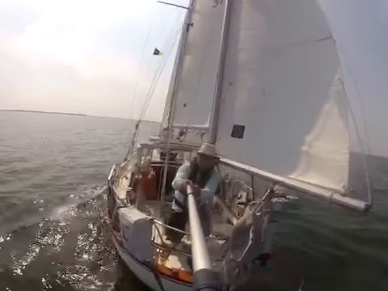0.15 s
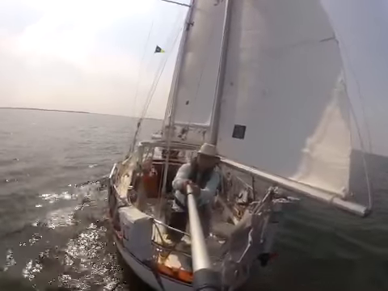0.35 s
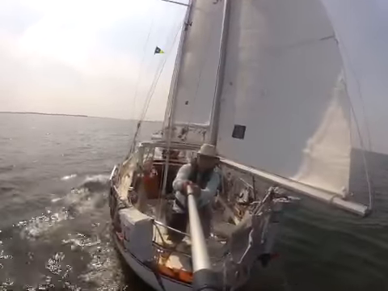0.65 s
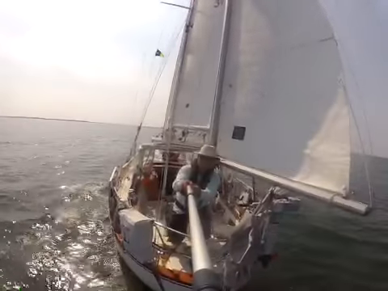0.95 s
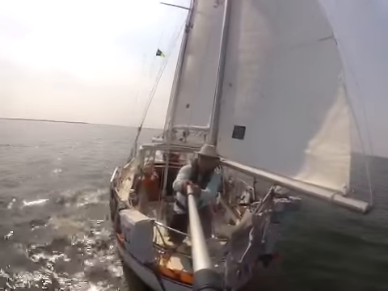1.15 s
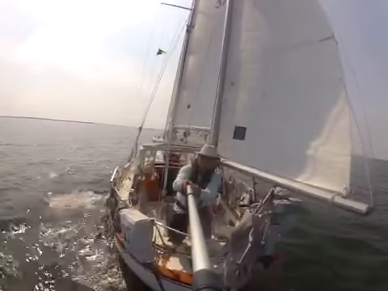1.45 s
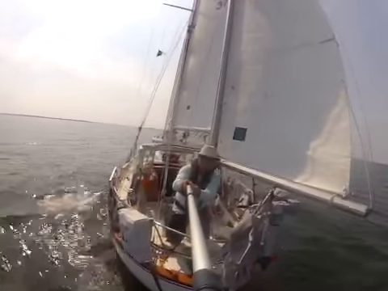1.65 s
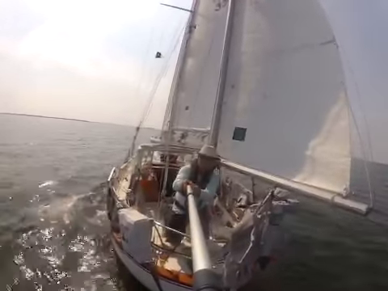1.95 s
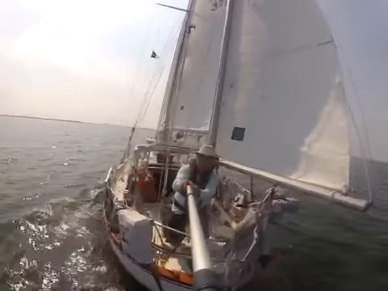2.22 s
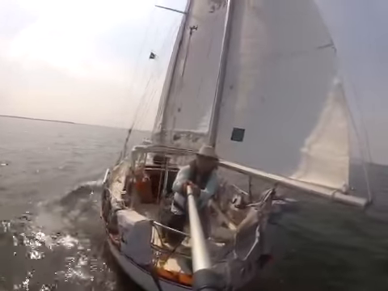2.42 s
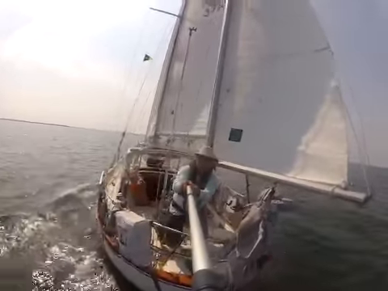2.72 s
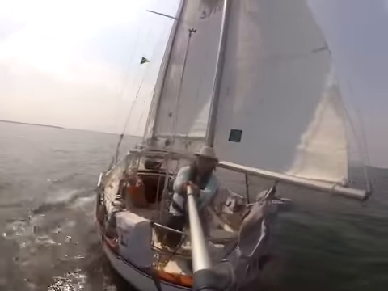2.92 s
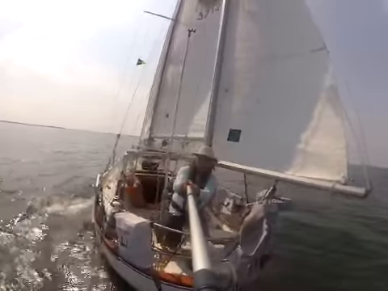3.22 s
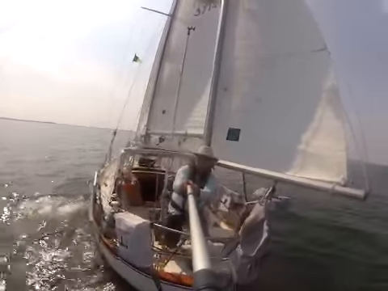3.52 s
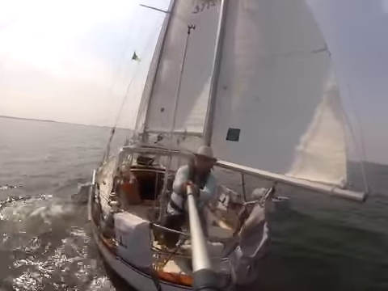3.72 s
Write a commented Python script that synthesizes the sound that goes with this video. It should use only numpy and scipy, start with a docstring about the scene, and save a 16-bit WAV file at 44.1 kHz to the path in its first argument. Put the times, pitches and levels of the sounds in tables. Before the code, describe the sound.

Water washes along a small sailboat's hull in gentle, fizzing surges, with a few plops and one dull slap. Low wind rumbles and hums at the microphone, gear knocks briefly on deck, and faint high chirps come and go.

```python
"""At the stern of a small sailboat under way, the microphone in a cased camera on a long pole.
Water washes along the hull in surges, fizzing, plopping and once slapping. Right at the microphone,
wind rumbles on the case and sets the pole humming. Gear knocks on deck, and thin chirps and peeps
(squeaking rigging or far birds) come in runs. The camera samples coarsely, which mirrors the sound
into the treble."""
import sys
import numpy as np
from scipy import signal
from scipy.fft import rfft, irfft, next_fast_len
from scipy.io import wavfile
from scipy.ndimage import map_coordinates

SR = 44100
rng = np.random.default_rng(int(sys.argv[2]) if len(sys.argv) > 2 else 0)


def inscribe(sig):
    """Save sig as 16-bit PCM at rate SR to the path in sys.argv[1].

    A 1-D sig is mono; a 2-D sig holds one channel per row.
    Samples are clipped to [-1, 1] before scaling.
    """
    pcm = np.round(np.clip(np.atleast_2d(sig).T, -1, 1) * 32767)
    wavfile.write(sys.argv[1], SR, pcm.astype(np.int16))


N = 170667

# resonances of the case around the microphone: centre_hz, width_hz, boost_db
CASE_RESONANCES = [(1112, 190, 4.5), (1854, 136, 7), (2426, 416, 6.5), (4630, 300, 3.5)]
# colour of the steady wash: frequency_hz, gain_db
WASH_COLOUR = [(200, -4), (600, -3), (950, 0), (1500, 0.5), (2200, -1.5), (2800, -2.5), (3250, 0.5),
               (4200, -1.5), (5000, -3), (5700, -8.5)]
# waves running along the hull: start_s, end_s, level_db
HULL_SURGES = [(-.6, 0.074, -75.5), (0.087, .99, -71.5), (1.797, 3.002, -70.5), (3.457, 3.9, -74.5)]
# colour of their foam: frequency_hz, gain_db
FOAM_COLOUR = [(400, -1), (800, -13), (1150, -3), (1550, -11.5), (1850, -5.5), (2350, -2), (2780, -5),
               (3200, 2.5), (3800, 0), (4400, -16.5), (5100, -4.5), (5600, -21.5)]
# colour of the wind on the case: frequency_hz, gain_db
WIND_COLOUR = [(4, -20), (11, 0.5), (20, 4), (42, -6.5), (60, -5.5), (95, -12), (160, -19), (260, -22),
               (380, -25.5), (600, -32), (1000, -39.5), (4000, -61.5)]
# single buffets on the case: peak_s, pitch_hz, level_db
WIND_BUFFETS = [(.731, 58, -37.5), (0.91, 55, -39), (0.942, 35, -35.5), (1.059, 55, -36.5),
                (1.377, 46.5, -35.5), (2.283, 108, -44.5), (2.79, 90.5, -42)]
# the pole's lowest, middle and upper bending tones: pitch_hz, wander_hz, gain_db
POLE_TONES = [(24.75, 3.42, -1), (70.23, 4.474, -1.5), (119.7, 5, -2.5)]
# swell of the middle tone, before its gain: time_s, level_db
POLE_MIDDLE_SWELL = [(0, -56.5), (.19, -61), (.3, -53), (1.14, -61.5), (1.25, -48.5), (1.55, -66),
                     (2.0, -59.5), (2.15, -49.5), (2.5, -61), (2.67, -52.5), (2.95, -56.5), (3.87, -56)]
# swell of the upper tone, before its gain: time_s, level_db
POLE_UPPER_SWELL = [(0, -64), (1.9, -63.5), (2.4, -60.5), (3.87, -60)]
# flares of the upper tone, before its gain: peak_s, level_db
POLE_FLARES = [(.26, -55), (.57, -56), (1.06, -53.5), (1.77, -57), (2.43, -51.5), (2.95, -52.5),
               (3.11, -50.5), (3.329, -48.5), (3.75, -50.5)]
# runs of peeps: start_s, end_s, level_db
PEEP_RUNS = [(.061, .19, -69), (.262, .27, -66), (.432, .67, -69), (.935, 1.18, -73), (1.264, 1.99, -70),
             (2.102, 2.23, -67.5), (2.36, 2.85, -71.5), (3.059, 3.54, -69)]
# runs of chirps: start_s, end_s, relative_level_db, shift_hz
CHIRP_RUNS = [(.172, .18, -72, -100), (.29, .9, -69, -20), (1.019, 1.15, -74.5, -120),
              (2.215, 2.22, -68.5, 80), (2.336, 2.83, -71, -140), (3.55, 3.56, -72, -140),
              (3.668, 3.8, -70, 20)]
# gear knocking on deck: start_s, level_db, dullness_db_per_octave, ring_db
DECK_KNOCKS = [(.68, -54, 0, -2), (1.3003, -46, 3, -4), (1.3055, -46.5, 0, 0), (1.326, -55, 1, 0),
               (2.7485, -48, 5, -3), (3.753, -51.5, -1, -5)]
# colour of a contact's crack: frequency_hz, gain_db
CRACK_COLOUR = [(700, -16), (1800, -10), (2400, 0), (5000, -4)]
# ringing modes of the gear: pitch_hz, gain_db, t60_s
GEAR_MODES = [(1150, -18, .05), (2290, -3, .025), (2525, -1, .048), (3570, -11, .06), (3760, -11, .04)]
# a wave slapping the hull: start_s, level_db
HULL_SLAPS = [(0.7496, -51)]
# modes of the slapped hull: pitch_hz, gain_db, t60_s
HULL_MODES = [(155, 2, 0.14), (516, -9, 0.1), (763, 0, 0.026), (1130, -0.5, 0.03)]
# single bubbles in the wake: start_s, pitch_hz, relative_level_db
WAKE_PLOPS = [(0.936, 1100, -61.5), (1.017, 1074, -63.5), (1.107, 1073, -59), (1.93, 4720, -59),
              (2.094, 2070, -59.5), (2.293, 4850, -58), (2.303, 1280, -57.5), (2.32, 1057, -57),
              (2.362, 1380, -63), (2.369, 2220, -59.5), (2.937, 1850, -60.5), (3.6, 1820, -61.5)]
# stereo width of water and wind: frequency_hz, side_db
STEREO_WIDTH = [(60, -57), (250, -17.5), (1000, -19), (4000, -13)]

TIME_S = np.arange(N) / SR


def amp(db):
    """Decibels to gain."""
    return 10 ** (np.asarray(db) / 20)


def unit(x):
    """Scale to rms 1."""
    return x / np.sqrt(np.mean(x ** 2) + 1e-20)


def along(points, hz):
    """Interpolate (Hz, value) points on a log frequency axis."""
    f, values = np.transpose(points)
    return np.interp(np.log(hz + 1), np.log(f + 1), values)


def curve(points):
    """Interpolate (seconds, value) points at every sample."""
    return np.interp(TIME_S, *np.transpose(points))


def wobble(rate):
    """A smooth random curve, rate knots a second."""
    return map_coordinates(rng.standard_normal(4096), [TIME_S * rate + 2], mode="wrap")


def filtered(x, response):
    """Filter x by a gain that is a function of frequency."""
    size = next_fast_len(N + SR // 2)
    return irfft(rfft(x, size) * response(np.fft.rfftfreq(size, 1 / SR)), size)[..., :N]


def add(track, s, sound):
    """Mix a sound into the track at time s."""
    part = track[max(round(s * SR), 0):][:len(sound)]
    part += sound[:len(part)]


def tone(hz):
    """A sine that follows a pitch curve."""
    return np.sin(2 * np.pi * (np.cumsum(hz) / SR + rng.random()))


def cased(x, colour):
    """A sound coloured and heard through the resonant case, at rms 1."""
    def boost_db(f):
        return sum(db / (1 + (2 * (f - hz) / width) ** 4) for hz, width, db in CASE_RESONANCES)
    return unit(filtered(x, lambda f: amp(along(colour, f) + boost_db(f))))


def bubbles(per_s, centre_hz, scatter, cycles, spread_db, rise):
    """A cloud of bubbles: damped sines of random pitch and strength that glide upwards."""
    when, pitch, weakness = rng.random((int(per_s * N / SR), 3)).T
    hz = np.clip(centre_hz * (pitch / (1 - pitch)) ** scatter, 300, 5500)[:, None]
    step = np.arange(SR // 50)
    turns = hz * step / SR
    age = turns / cycles
    strength = amp(-spread_db * np.log(weakness + 0.05))[:, None]
    envelope = np.exp(-2 * age) * (1 - np.exp(-20 * age))
    ring = np.sin(2 * np.pi * turns * (1 + rise * np.minimum(age, 2) / 2))
    positions = (when * N).astype(int)[:, None] + step
    return np.bincount(positions.ravel(), (strength * envelope * ring).ravel(), N)[:N]


def churn(colour, fizz_db, bubble_db):
    """Broken water: a smooth rush with fizzing spray and bubbles in it."""
    rush = amp(0.98 * wobble(11)) * cased(rng.standard_normal(N), colour)
    fizz_gain = amp(fizz_db + 2.5 * wobble(30))
    spray = bubbles(per_s=900, centre_hz=2880, scatter=0.277, cycles=2.5, spread_db=3.5, rise=0.017)
    burble = bubbles(per_s=150, centre_hz=1588, scatter=0.2524, cycles=16.4, spread_db=3.5, rise=0.084)
    return rush + fizz_gain * cased(spray, colour) + amp(bubble_db) * cased(burble, colour)


def water():
    """A steady wash, and waves that build up crackling foam along the hull and drop away quickly."""
    rise_s, fall_s = 0.58, 0.04
    surge = np.zeros(N)
    for start, end, db in HULL_SURGES:
        build = np.clip((TIME_S - start) / rise_s, 0, 1)
        surge += amp(db) * build * np.exp(-np.maximum(TIME_S - end, 0) / fall_s)
    crackle = bubbles(per_s=110, centre_hz=1860, scatter=0.025, cycles=14, spread_db=2, rise=0.011)
    wash = churn(WASH_COLOUR, fizz_db=-6.5, bubble_db=-12.5)
    foam = churn(FOAM_COLOUR, fizz_db=-7, bubble_db=-2) + amp(-5) * unit(crackle)
    return amp(-68.5) * wash + surge * foam


def wind():
    """Wind on the case, right at the microphone: a low, uneven rumble with a few soft buffets."""
    buffet_s = 0.0074
    gusts = amp(-49.5 + 0.45 * wobble(13))
    out = gusts * unit(filtered(rng.standard_normal(N), lambda f: amp(along(WIND_COLOUR, f))))
    for s, hz, db in WIND_BUFFETS:
        t = TIME_S - s
        out += amp(db) * np.exp(-(t / buffet_s) ** 2) * np.cos(2 * np.pi * hz * t)
    return out


def pole_hum():
    """Wind keeps the pole's bending tones humming unsteadily; eddies make the upper one flare."""
    flare_s, throb_db = 0.042, 1.7
    flares = sum(amp(db) * np.exp(-((TIME_S - s) / flare_s) ** 2) for s, db in POLE_FLARES)
    lowest, middle = amp(-50.5), amp(curve(POLE_MIDDLE_SWELL))
    upper = np.hypot(amp(curve(POLE_UPPER_SWELL)), flares)
    out = np.zeros(N)
    for (hz, wander_hz, db), swell in zip(POLE_TONES, [lowest, middle, upper]):
        rms = swell * amp(db + throb_db * wobble(16))
        out += np.sqrt(2) * rms * tone(hz + wander_hz * wobble(16))
    return out


def peeps():
    """Rigging or far birds: short rising peeps on an even beat, each trailed by a weaker falling one."""
    every_s, length_s = 0.119, 0.024
    start_hz, rise_hz_per_s, rasp_hz = 4480, 10000, 75
    out, t = np.zeros(N), np.arange(int(length_s * SR)) / SR
    envelope = np.sin(np.pi * t / length_s)
    waver_hz = rasp_hz * wobble(700)
    for start, end, db in PEEP_RUNS:
        for s in np.arange(start, end, every_s):
            scatter_db, scatter_hz, scatter_s = rng.normal(0, [1.5, 45, 0.011])
            hz = start_hz + scatter_hz + rise_hz_per_s * t + waver_hz[int(s * SR):][:len(t)]
            add(out, s, amp(db + scatter_db) * envelope * tone(hz))
            add(out, s + 0.041 + scatter_s, amp(db - 5) * envelope * tone(hz[::-1]))
    return out


def chirps():
    """Rigging or far birds: raspy chirps glide up and level off, each trailed by a sagging undertone."""
    every_s, length_s, glide_s, undertone_delay_s = 0.121, 0.085, 0.032, 0.038
    start_hz, top_hz, rasp_hz, sag_hz_per_s = 3600, 4240, 75, 3600
    dip_db, fade_db, flutter_db = 4, 4, 2
    out, t = np.zeros(N), np.arange(int(length_s * SR)) / SR
    thinning_db = dip_db * np.sin(np.pi * t / length_s) ** 2 + fade_db * t / length_s
    envelope = signal.windows.tukey(len(t), 0.2) * amp(-thinning_db)
    glide_hz = top_hz - (top_hz - start_hz) * np.exp(-t / glide_s)
    undertone_hz = 3980 - sag_hz_per_s * t
    waver_hz = 45 * wobble(140) + rasp_hz * wobble(900)
    for start, end, db, shift_hz in CHIRP_RUNS:
        for s in np.arange(start, end, every_s):
            waver = np.roll(waver_hz, -int(s * SR))[:len(t)]
            add(out, s, amp(db) * envelope * tone(glide_hz + shift_hz + waver))
            add(out, s + undertone_delay_s, amp(db - 3) * envelope * tone(undertone_hz - waver))
    return out * amp(3.5 + flutter_db * wobble(230))


def knocks():
    """On deck, each contact cracks and rings the gear briefly; soft contacts favour its low modes."""
    rise_s, crack_t60_s = 0.0006, 0.028
    out, t = np.zeros(N), np.arange(SR // 10) / SR
    attack = 1 - np.exp(-t / rise_s)
    grit = cased(rng.standard_normal(N), CRACK_COLOUR)
    for s, db, dullness, ring_db in DECK_KNOCKS:
        ring = np.zeros(len(t))
        for hz, mode_db, t60 in GEAR_MODES:
            tilt_db = dullness * np.log2(hz / 2500)
            ring += amp(mode_db - tilt_db - 60 * t / t60) * tone(np.full(len(t), hz))
        crack = amp(-3 - 60 * t / crack_t60_s) * grit[int(s * SR) // 2:][:len(t)]
        add(out, s, amp(db) * attack * (amp(ring_db) * ring + crack))
    return out


def hull_slap():
    """A wave smacks the hull, which answers with a short dull thud."""
    smack_t60_s = 0.0093
    out, t = np.zeros(N), np.arange(SR // 5) / SR
    for s, db in HULL_SLAPS:
        thud = sum(amp(mode_db - 60 * t / t60) * np.sin(2 * np.pi * hz * t)
                   for hz, mode_db, t60 in HULL_MODES)
        smack = amp(-7 - 60 * t / smack_t60_s) * rng.standard_normal(len(t))
        add(out, s, amp(db) * (thud + smack))
    return out


def plops():
    """Larger bubbles in the wake: a soft start and an unsteady rising pitch; small ones die sooner."""
    rise_s, glide_per_s, t60_cycles = 0.0015, 3.9, 72
    out, t = np.zeros(N), np.arange(SR // 10) / SR
    attack = 1 - np.exp(-t / rise_s)
    for s, hz, db in WAKE_PLOPS:
        pitch_hz = hz * (1 + glide_per_s * t + 0.075 * wobble(316)[:len(t)])
        add(out, s, 2 * attack * amp(db - 60 * t * hz / t60_cycles) * tone(pitch_hz))
    return out


def scene():
    """The boat from the end of the pole: nearly mono, with a little width in the water and wind."""
    mid = water() + plops() + hull_slap() + wind() + pole_hum() + knocks() + chirps() + peeps()
    side = filtered(water() + wind(), lambda f: amp(along(STEREO_WIDTH, f)))
    return np.array([mid + side, mid - side])


def record(dry):
    """The camera holds each coarse sample, mirroring its narrow band into the treble."""
    hold_hz, top_hz = 12000, 15400

    def mirror_gain(f):
        """The hold weakens the mirror image, down to a null at the hold rate."""
        angle_per_hz = np.pi / (4 * hold_hz)
        droop = np.sin(angle_per_hz * (f - hold_hz)) / np.sin(angle_per_hz * np.maximum(f, 1))
        return (f > hold_hz / 2) * droop

    band = filtered(dry, lambda f: np.clip((hold_hz / 2 + 150 - f) / 650, 0, 1))
    mirror = filtered(2 * band * np.cos(2 * np.pi * hold_hz * TIME_S), mirror_gain)
    return filtered(band + mirror.mean(axis=0), lambda f: f < top_hz)


dry = scene()
out = record(dry)
inscribe(out)
```